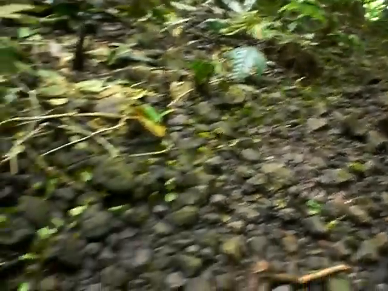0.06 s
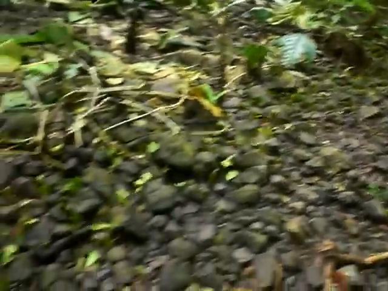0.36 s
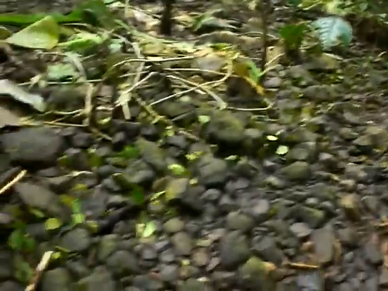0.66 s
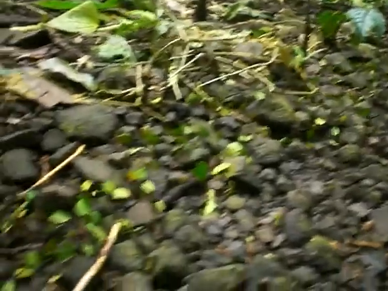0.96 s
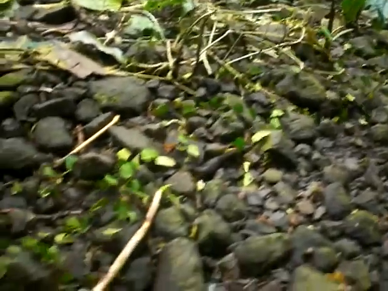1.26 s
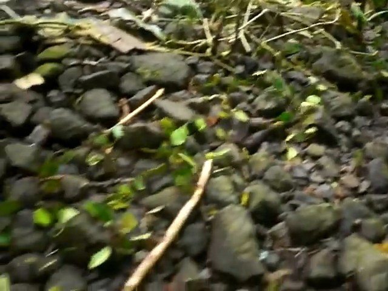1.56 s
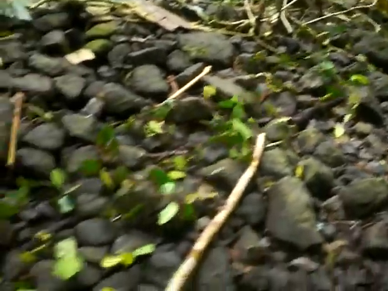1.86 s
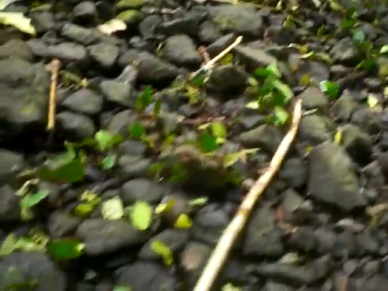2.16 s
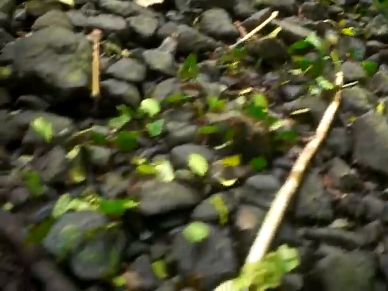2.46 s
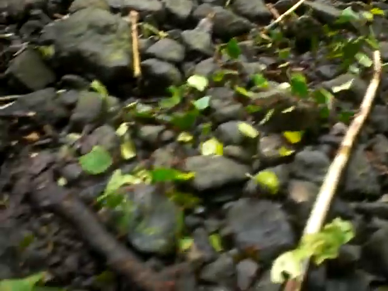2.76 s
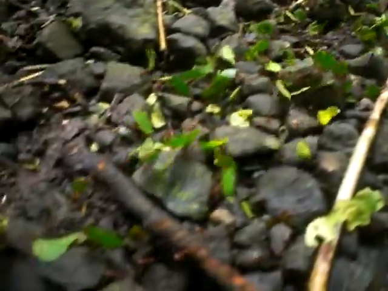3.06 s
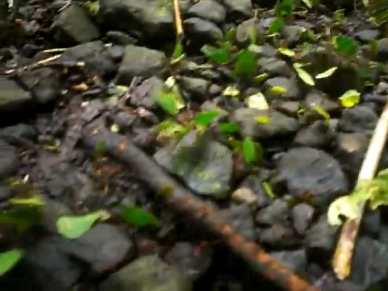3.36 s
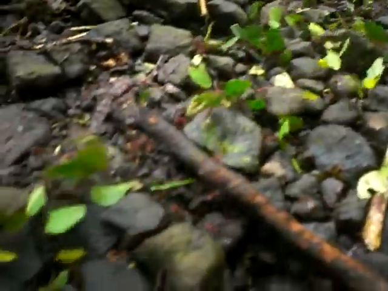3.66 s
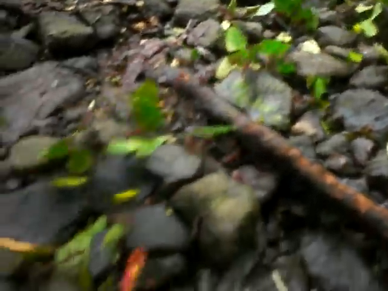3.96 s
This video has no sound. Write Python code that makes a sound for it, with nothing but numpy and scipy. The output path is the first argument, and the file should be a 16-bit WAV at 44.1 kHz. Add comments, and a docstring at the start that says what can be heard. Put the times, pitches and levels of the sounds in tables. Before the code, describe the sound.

Camera handling rumble and soft bumps over a faint, steady forest hiss.

```python
"""A stony forest floor, heard from a hand-held camera carried slowly over it.
From the start, distant water and leaves hiss, insects buzz high up and handling makes a low rumble.
In the first half a few stones and twigs click, gravel scuffs and a small bird chips once.
In the last second the rumble swells and breaks into a run of soft bumps on the camera body,
with two faint hoots and one more scuff behind them."""
import sys
import numpy as np
from scipy import signal
from scipy.fft import rfft, irfft
from scipy.io import wavfile

SR = 44100
rng = np.random.default_rng(int(sys.argv[2]) if len(sys.argv) > 2 else 0)


def digitize_waveform(pressure):
    """Quantize a signal to 16-bit integers and store it at the path in sys.argv[1].

    Rows of a 2-D input are taken as channels; values are limited to [-1, 1].
    """
    field = np.atleast_2d(pressure).T
    bounded = np.clip(field, -1, 1)
    quanta = np.round(bounded * 32767).astype(np.int16)
    wavfile.write(sys.argv[1], SR, quanta)


N = 176400  # 4 seconds


def gain(db):
    """Turn decibels into a number to multiply by."""
    return 10 ** (np.asarray(db) / 20)


def unit_level(x):
    """Scale a signal so its average strength (rms) is 1."""
    return x / np.sqrt(np.mean(x ** 2))


def clock():
    """The time of every sample, in seconds."""
    return np.arange(N) / SR


def frequencies():
    """Every frequency in the spectrum, in Hz."""
    return np.maximum(np.arange(N // 2 + 1) * SR / N, 1)


def noise(shape):
    """Noise with the given gain at each frequency."""
    return irfft(rfft(rng.standard_normal(N)) * shape, N)


def tone_shape(points):
    """Join (frequency_hz, level_db) points into a gain for each frequency."""
    hz, db = np.array(points).T
    return gain(np.interp(np.log(frequencies()), np.log(hz), db))


def resonance(hz, width_hz):
    """Gains that favour one pitch and fall steeply on both sides."""
    off_pitch = (frequencies() / hz - hz / frequencies()) * hz / width_hz / 2
    return 1 / (1 + 2 * off_pitch ** 2)


def wander(rate_hz):
    """A smooth random wobble of size about 1, changing about rate_hz times a second."""
    return unit_level(noise(np.exp(-(frequencies() / rate_hz) ** 2)))


def uneven_noise(shape, wobble_db, rate_hz):
    """Shaped noise whose loudness wobbles at random."""
    return unit_level(noise(shape) * gain(wobble_db * wander(rate_hz)))


def whistle(hz, progress, roughness):
    """A wavering tone that swells and fades as progress goes from 0 to 1."""
    wavering_hz = hz * (1 + roughness * wander(267))
    swell = np.sqrt(abs(np.sin(np.pi * progress)))
    return np.sin(2 * np.pi * np.cumsum(wavering_hz) / SR) * swell


def among_trees(x, echo_db, echo_s=0.37):
    """Add the blurred echo of trunks and leaves, which dies by 60 dB in echo_s."""
    tail = rng.standard_normal(N) * gain(-60 * clock() / echo_s)
    return x + gain(echo_db) * signal.fftconvolve(x, tail / np.linalg.norm(tail))[:N]


# The tone of the hiss, from low to high. Columns: frequency_hz, relative_level_db
HISS_TONE = [(60, -15.5), (250, -1), (500, 0.5), (850, -0.5), (1200, 0), (1750, -3.5), (2300, -2),
             (3000, -2.5), (4300, -4.5), (5800, -7), (7300, -9.5), (8600, -11.5), (12000, -17.5)]


def water_and_leaves(level_db=-44.5, swell_db=0.37, flicker_db=0.31, treble_hz=4500):
    """Far water and leaves hiss in octave-wide bands that swell together and flicker alone."""
    shape, swell, out = tone_shape(HISS_TONE), wander(1), 0
    octaves = np.log2(frequencies())
    for octave in range(4, 15):
        band = noise(shape * np.sqrt(np.maximum(1 - abs(octaves - octave), 0)))
        # The treble dulls as the camera moves on.
        fade_db = 0.21 * min(2 ** octave / treble_hz, 1) ** 2 * clock()
        out = out + band * gain(swell_db * swell + flicker_db * wander(16) - fade_db)
    return unit_level(out) * gain(level_db)


def insects(start_db=-56, fade_db_per_s=1.6):
    """Many far insects blend into one high, throbbing buzz that fades."""
    buzz = uneven_noise(resonance(hz=6340, width_hz=280), wobble_db=1.5, rate_hz=25)
    return buzz * gain(start_db - fade_db_per_s * clock())


# Faint hoots. Columns: start_s, length_s, pitch_hz, rise_hz_per_s, level_db
FAR_HOOTS = [(3.491, 0.27, 591, 520, -51.5), (3.932, 0.089, 713, 200, -47)]


def hoots():
    """Hollow tones, perhaps a far bird, slide slowly upward and echo."""
    out = 0
    for start_s, length_s, pitch_hz, rise_hz_per_s, level_db in FAR_HOOTS:
        age = np.clip(clock() - start_s, 0, length_s)
        hoot = whistle(pitch_hz + rise_hz_per_s * age, age / length_s, roughness=0.041)
        out = out + gain(level_db) * hoot
    return among_trees(out, echo_db=-4)


# Faint scuffs on the gravel. Columns: middle_s, half_length_s, level_db
GRAVEL_SCUFFS = [(0.773, 0.14, -53.5), (3.975, .025, -49)]


def gravel():
    """Loose gravel shifts in brief, grainy scuffs."""
    grit = uneven_noise(resonance(hz=885, width_hz=510), wobble_db=5.5, rate_hz=150)
    return grit * sum(gain(level_db) * np.exp(-((clock() - middle_s) / half_length_s) ** 2)
                      for middle_s, half_length_s, level_db in GRAVEL_SCUFFS)


# The pitch of the bird's call, moment by moment. Columns: time_s, pitch_hz
CHIP_PITCH = [(1.706, 6970), (1.718, 6750), (1.733, 7200), (1.750, 7250), (1.775, 7340)]


def bird(level_db=-49):
    """A small bird gives one thin chip that dips, rises and echoes."""
    time_s, pitch_hz = np.array(CHIP_PITCH).T
    progress = np.clip((clock() - time_s[0]) / (time_s[-1] - time_s[0]), 0, 1)
    chip = whistle(np.interp(clock(), time_s, pitch_hz), progress, roughness=0.0238)
    return among_trees(chip * gain(level_db), echo_db=-4)


# Stone and twig clicks. Columns: start_s, level_db, pitch_hz, ring_s (time to fade by 60 dB)
STONE_CLICKS = [(.6547, -30.5, 1450, .008), (0.7674, -31.5, 1260, .007), (0.7682, -37, 430, .045),
                (1.5097, -28, 2430, 0.0054), (1.5375, -27.5, 2510, 0.0064), (2.1053, -28.5, 530, .011)]


def stones_and_twigs(rise_s=0.00018, crack_amount=0.35):
    """Each click is a short ring, made rough by a crack of noise."""
    out = 0
    for start_s, level_db, pitch_hz, ring_s in STONE_CLICKS:
        age = np.maximum(clock() - start_s, 0)
        ring = np.sin(2 * np.pi * pitch_hz * age)
        crack = crack_amount * unit_level(noise(resonance(pitch_hz, width_hz=pitch_hz)))
        rise = 1 - np.exp(-age / rise_s)
        fade = gain(-60 * np.minimum(age / ring_s, 10))
        click = (ring + crack) * rise * fade
        out = out + gain(level_db) * click / abs(click).max()
    return among_trees(out, echo_db=-10.5)


# The deep tone of the rumble. Columns: frequency_hz, relative_level_db
RUMBLE_TONE = [(22, -37), (40, -31), (55, -8), (75, 1.5), (100, -0.5), (140, -5), (200, -10.5),
               (280, -17.5), (420, -26.5), (800, -59)]
# How loud the rumble is over time. Columns: time_s, level_db
RUMBLE_LOUDNESS = [(0, -50), (.38, -47.5), (.68, -39.5), (.93, -40), (1.2, -42.5), (1.9, -40.5),
                   (2.17, -39.5), (2.32, -42), (2.43, -38.5), (2.78, -41), (3.12, -34), (3.28, -29.5),
                   (3.55, -29.5), (3.72, -33.5), (3.82, -34), (4, -36.5)]


def handling_rumble():
    """The carried camera shudders unevenly."""
    shudder = uneven_noise(tone_shape(RUMBLE_TONE), wobble_db=2.5, rate_hz=36)
    time_s, level_db = np.array(RUMBLE_LOUDNESS).T
    return shudder * gain(np.interp(clock(), time_s, level_db))


# Bumps on the camera body. Columns: time_s, level_db, softness_ms (longer sounds duller)
CAMERA_BUMPS = [(.680, -28.5, 1.9), (.926, -30, 1.7), (2.116, -28, 1.2), (2.120, -26.5, 1.26),
                (2.148, -30.5, 1.3), (2.184, -25, 1.4), (2.225, -27.5, 1.3), (2.414, -26, 2.1),
                (2.571, -27.5, 1.8), (2.888, -29, 1.5), (3.046, -21, 1.24), (3.054, -25, 1.2),
                (3.206, -21.5, 1.1), (3.248, -19, 0.96), (3.269, -13.5, 1.75), (3.294, -15, 0.9),
                (3.309, -12.5, 0.6), (3.323, -16, 1.3), (3.342, -19, 0.76), (3.396, -11.5, 1.3),
                (3.429, -14.5, 0.89), (3.456, -14, 2.2), (3.474, -17.5, 0.93), (3.4984, -10.5, 1.16),
                (3.517, -27, 1.3), (3.539, -21, 1.04), (3.555, -14, 1.2), (3.580, -21.5, 0.8),
                (3.6081, -14.5, 0.82), (3.640, -15, 1.33), (3.682, -18, 0.86), (3.723, -22.5, 1.4),
                (3.792, -17.5, 1.27), (3.808, -23.5, 0.84), (3.840, -15.5, 1.3), (3.851, -14, 1.4),
                (3.883, -23.5, 1.16), (3.918, -21.5, 1.0)]


def handling_bumps(mic_low_cut_hz=78, deep_cut_hz=61):
    """Each bump is a soft push that swings back because the microphone cuts the lowest bass."""
    low_cut = signal.butter(2, mic_low_cut_hz, btype="high", fs=SR, output="sos")
    out = 0
    for time_s, level_db, softness_ms in CAMERA_BUMPS:
        offset_ms = (clock() - time_s) * 1000
        push = 1e-12 - np.exp(-.5 * np.minimum(abs(offset_ms / softness_ms), 10) ** 2)
        bump = signal.sosfilt(low_cut, push)
        out = out + gain(level_db) * bump / abs(bump).max()
    deep_cut = 1 / (1 + (deep_cut_hz / frequencies()) ** 4)
    return irfft(rfft(out) * deep_cut, N)


def scene():
    """The forest with the handling noise on top, in one channel."""
    forest = water_and_leaves() + insects() + bird() + hoots() + stones_and_twigs() + gravel()
    return (forest + handling_rumble() + handling_bumps())[None]


def record(dry, notch_hz=7850, notch_width_hz=210, top_hz=12000):
    """The camera loses one narrow slice of the treble and cuts off the very highest sounds."""
    notch = signal.iirnotch(notch_hz, notch_hz / notch_width_hz, fs=SR)
    top_cut = signal.ellip(12, .1, 80, top_hz, fs=SR, output="sos")
    return signal.sosfilt(top_cut, signal.lfilter(*notch, dry))


dry = scene()
out = record(dry)
digitize_waveform(out)
```